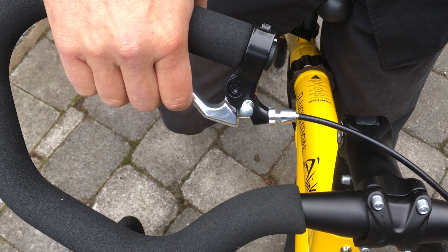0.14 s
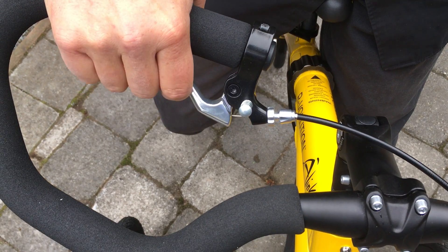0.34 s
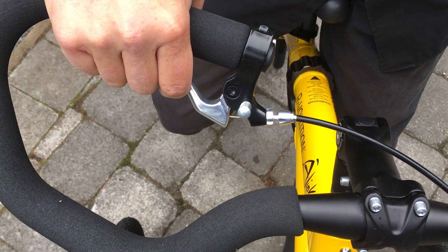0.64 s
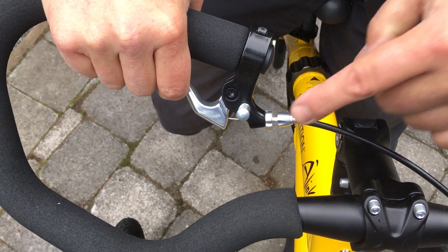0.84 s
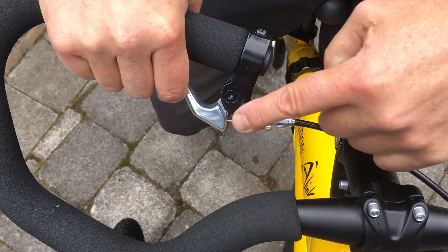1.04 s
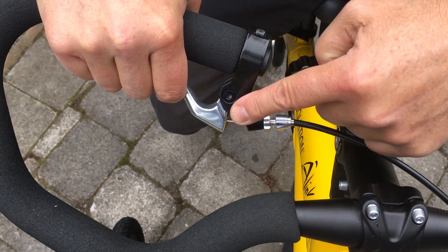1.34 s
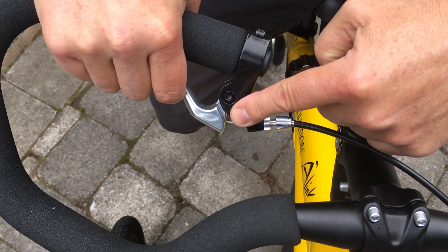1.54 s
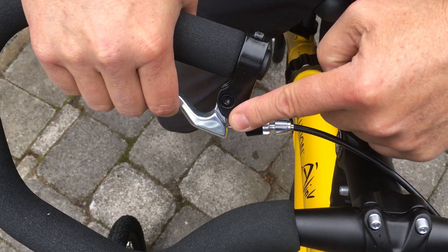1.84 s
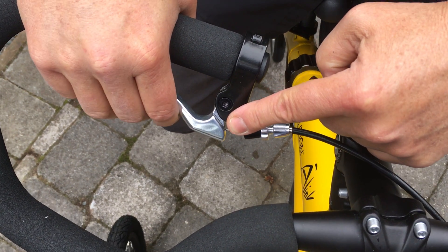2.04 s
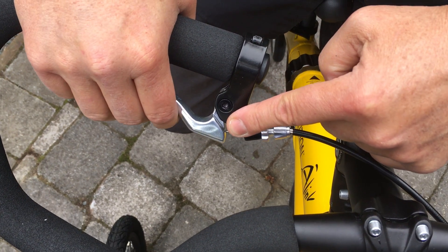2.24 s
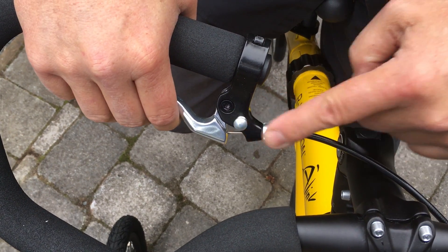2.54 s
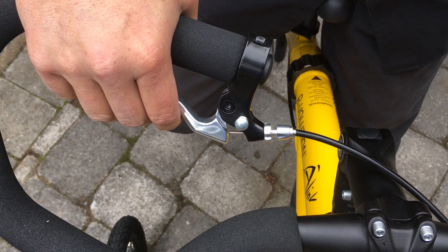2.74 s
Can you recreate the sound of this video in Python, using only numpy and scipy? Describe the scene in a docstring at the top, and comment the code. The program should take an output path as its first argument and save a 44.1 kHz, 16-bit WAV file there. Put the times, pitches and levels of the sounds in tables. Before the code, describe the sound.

A bicycle brake lever lock clicks, heard close outdoors over faint steady traffic rumble and a distant low engine. Light knocks and a cable ping come around 0.03-0.15 s, a sleeve slips and swishes at 0.4-0.65 s, and a fingertip rubs softly at 1.2 s. Ticks and a quick scrape from 1.35 s lead to one bright, sharp snap at 1.4 s, briefly rattling and ringing. Thin hiss lingers until about 1.8 s; faint ticks continue to 2.55 s.

```python
"""A hand squeezes a bicycle brake lever outdoors and a finger presses its lock pin home.
Under it all lie a rumble, street wash, far tyres (coloured noise) and a distant engine (two sines).
First come small knocks and ticks (noise bursts) with cable pings (dying sines), then a sleeve's slips and swish.
A fingertip rubs and the pin scrapes (shaped noise), amid more ticks, until the lock snaps in with one
sharp click, a burst with rattle and ringing. A thin hiss lingers, and a few last ticks follow."""
import sys
import numpy as np
from scipy import signal
from scipy.fft import rfft, irfft
from scipy.io import wavfile

SR = 44100
rng = np.random.default_rng(int(sys.argv[2]) if len(sys.argv) > 2 else 0)


def dump_mix(stems):
    """Bounce the given channels to the path in sys.argv[1] as a 16-bit WAV at rate SR."""
    frames = np.atleast_2d(stems).T  # one column per channel
    limited = np.clip(frames, -1, 1)  # hard clip at full scale
    pcm = np.round(limited * 32767).astype(np.int16)
    wavfile.write(sys.argv[1], SR, pcm)


N = 127890
T = np.arange(N) / SR


def amp(db):
    """Decibels to gain."""
    return 10 ** (np.asarray(db) / 20)


def unit(x):
    """Scales to rms 1."""
    return x / np.sqrt(np.mean(x ** 2) + 1e-20)


def add(mix, start_s, sound):
    """Mixes a sound in at a time, cutting whatever runs past the end."""
    part = mix[max(round(start_s * SR), 0):][:len(sound)]
    part += sound[:len(part)]


def read(colour, hz):
    """Reads a colour in dB at any frequency, on a log-frequency axis."""
    point_hz, point_db = np.transpose(colour)
    return np.interp(np.log(hz + 1), np.log(point_hz), point_db)


def level(points):
    """Gain over time, drawn through (time_s, level_db) points."""
    return amp(np.interp(T, *np.transpose(points)))


def stroke(points):
    """Gain over time of a passing gesture: silent before its first point and after its last."""
    return level(points) * (T > points[0][0]) * (T < points[-1][0])


def tint(x, colour):
    """Filters a sound by a colour."""
    hz = np.fft.rfftfreq(len(x), 1 / SR)
    return irfft(rfft(x) * amp(read(colour, hz)), len(x))


def noise(colour):
    """Steady coloured noise of rms 1."""
    return unit(tint(rng.standard_normal(N), colour))


def wander(rate_hz):
    """Smooth random drift of rms 1, fading out above a rate."""
    hz = np.fft.rfftfreq(N, 1 / SR)
    spectrum = rfft(rng.standard_normal(N)) * np.exp(-(hz / rate_hz) ** 2)
    return unit(irfft(spectrum, N))


def lowpass(x, edge_hz):
    """Steep band limit."""
    taps = signal.firwin(255, edge_hz, window=("kaiser", 8), fs=SR)
    return signal.oaconvolve(x, taps, "same")


def burst(colour_db, rise_s, decay_s, size=4096):
    """A contact: a brief flurry of micro-impacts with a causal colour; level is rms over 100 samples."""
    t = np.arange(size) / SR
    envelope = np.minimum(t / rise_s, 1) * np.exp(-np.maximum(t - rise_s, 0) / decay_s)
    flurry = rng.standard_normal(size) * envelope
    # flatten the flurry's spectrum while keeping it short
    for _ in range(3):
        spectrum = rfft(flurry)
        flurry = irfft(spectrum / (abs(spectrum) + 1e-12)) * envelope ** .2
    # minimum phase: the colour rings only after each impact
    log_gain = np.log(amp(colour_db(abs(np.fft.fftfreq(size, 1 / SR)))))
    causal_filter = np.exp(np.conj(signal.hilbert(log_gain)))
    out = np.fft.ifft(np.fft.fft(flurry) * causal_filter).real
    return 10 * out / np.linalg.norm(out)


def ring(modes):
    """Dying sines at random phases, each falling 60 dB in its t60."""
    t = T[:SR // 2]
    out = np.zeros(len(t))
    for pitch_hz, level_db, t60_s in modes:
        decay = np.exp(-np.log(1000) * t / t60_s)
        out += amp(level_db) * decay * np.sin(2 * np.pi * (pitch_hz * t + rng.random()))
    return out


# low traffic rumble: [time_s, level_db]; its colour: [pitch_hz, relative_db]
RUMBLE_LEVEL = [(0, -52), (1.2, -55.5), (1.6, -53), (2.9, -53.5)]
RUMBLE_COLOUR = [(22, -45), (32, -19.5), (50, -1), (65, 4), (85, -2.5), (102, 5), (135, -3), (175, -6),
                 (220, -21), (400, -44.5)]


def rumble():
    """Traffic rumble: low coloured noise under a slow level curve."""
    return level(RUMBLE_LEVEL) * noise(RUMBLE_COLOUR)


# faint street wash: [time_s, level_db]; its colour: [pitch_hz, relative_db]
STREET_LEVEL = [(0, -56.5), (.25, -60.5), (.8, -60), (1.2, -62), (1.7, -61.5), (2.05, -64.5), (2.4, -63),
                (2.9, -61)]
STREET_COLOUR = [(100, 10.5), (250, 0.5), (430, -2), (700, -1), (1000, 2.5), (1500, -4.5), (2200, -12.5),
                 (3200, -16.5), (5000, -31), (9000, -29), (16000, -54)]


def street():
    """Street wash: coloured noise whose level flutters by a fraction of a decibel."""
    flutter = amp(0.63 * wander(46))
    return level(STREET_LEVEL) * noise(STREET_COLOUR) * flutter


# tyre hiss of traffic moving away: [time_s, level_db]; its colour: [pitch_hz, relative_db]
TYRE_LEVEL = [(0, -68.5), (.3, -71.5), (1, -75), (2, -75.5), (2.9, -74)]
TYRE_COLOUR = [(600, -13.5), (1400, 1), (2000, -2.5), (3200, -11), (5000, -20), (10000, -32.5)]


def tyres():
    """Far tyres: coloured noise that sinks as the traffic moves away."""
    return level(TYRE_LEVEL) * noise(TYRE_COLOUR)


# fine steady hiss: [pitch_hz, relative_db]
AIR_COLOUR = [(1000, 21.5), (4000, 0.5), (6200, 11.5), (7500, -32), (9000, 9.5), (10500, -21.5), (13000, 8),
              (16000, 6.5)]
AIR_DB = -77


def air():
    """Fine hiss: coloured noise at a constant level."""
    return amp(AIR_DB) * noise(AIR_COLOUR)


# distant engine, orders sounding at 2 and 3 times base_hz:
# [time_s, base_hz, second_order_db, third_order_db]
ENGINE_ORDERS = [(0, 38.54, -60, -56), (.75, 38.63, -59, -53.5), (1.2, 37.57, -55, -58.5),
                 (1.6, 37.4, -57.5, -59), (2.1, 37.76, -57, -59.5), (2.9, 36.8, -62.5, -62.5)]
ENGINE_WAVER = 0.013  # rms pitch drift, as a fraction of the pitch


def engine():
    """Two low orders locked to one turning rate, wavering and slowly sagging in pitch."""
    time_s, base_hz, second_db, third_db = np.transpose(ENGINE_ORDERS)
    rate_hz = np.interp(T, time_s, base_hz) * (1 + ENGINE_WAVER * wander(4.5))
    turns = np.cumsum(rate_hz) / SR
    out = np.zeros(N)
    for order, order_db in [(2, second_db), (3, third_db)]:
        tone = np.sin(2 * np.pi * (order * turns + rng.random()))
        out += np.sqrt(2) * amp(np.interp(T, time_s, order_db)) * tone
    return out


# knocks and ticks of lever, pin and cable:
# [start_s, level_db, centre_hz, width_octaves, treble_db, decay_s]
TICKS = [(0.0246, -52.5, 2830, 0.66, -13, .0006), (0.0548, -60, 2870, 0.14, -17, 0.00057),
         (0.142, -43.5, 1680, .2, -33, 0.0056), (0.1475, -47, 1470, 0.47, -21, 0.007),
         (0.294, -65.5, 12500, 0.48, -15, .002), (0.5748, -58.5, 3400, 0.38, -31, .0006),
         (1.3287, -52.5, 2504, 0.52, -19, .001), (1.3528, -39, 2700, 0.56, -28, .0005),
         (1.3528, -50.5, 14300, .25, -23, .0007), (1.3568, -53, 1800, 0.32, -37, 0.0027),
         (1.3630, -58, 2593, .9, -32, .001), (1.3752, -57, 3000, 0.82, -30, .001),
         (1.3838, -54, 2800, 0.94, -25, .001), (1.8030, -58.5, 630, 0.14, -38, .003),
         (1.8028, -58, 3270, .7, -17, .0012), (1.8594, -54.5, 2650, 0.26, -23, 0.002),
         (1.9330, -67, 12500, .35, -22, .002), (2.0451, -58.5, 2812, 0.16, -7, .0015),
         (2.5441, -55, 10010, .6, -14, 0.003), (2.5442, -63.5, 3300, 0.37, -25, 0.0016)]
# cable pings as the strain on it changes: [start_s, pitch_hz, level_db, t60_s]
PINGS = [(.025, 2800, -53, 0.019), (.0545, 2940, -59, .025), (.0545, 7470, -60, 0.017),
         (.1465, 3250, -44, 0.032), (0.16, 3230, -60.5, 0.14), (.146, 14200, -59, .03),
         (1.8595, 2230, -57.5, .04)]
# what lever and handlebar ring with, levels as at the main snap: [pitch_hz, level_db, t60_s]
LEVER_MODES = [(635, -45, 0.061), (1210, -60.5, 0.06), (1518, -37.5, 0.036), (2030, -56, 0.059),
               (3880, -47, 0.053), (5310, -54, 0.031), (5870, -47, 0.056), (6440, -51, 0.039),
               (9324, -47, 0.059), (11160, -56.5, .035), (11700, -61, 0.045), (13900, -55, 0.03)]
TICK_RISE_S, TICK_RING_DB, TICK_RING_HZ = 0.00033, 7, 2500


def ticks():
    """Light contacts, each a broad resonance with a bright edge, and the ping of the cable."""
    out = np.zeros(N)
    # a light contact excites the modes less the higher they lie
    soft_modes = []
    for pitch_hz, level_db, t60_s in LEVER_MODES:
        softening_db = 10 * np.log10(1 + (pitch_hz / TICK_RING_HZ) ** 2)
        soft_modes.append((pitch_hz, level_db - softening_db, t60_s))
    for start_s, level_db, centre_hz, width_octaves, treble_db, decay_s in TICKS:
        def colour(hz):
            octaves = np.log2((hz + 1) / centre_hz)
            resonance = np.exp(-.5 * (octaves / width_octaves) ** 2)
            edge = amp(treble_db) * hz / (hz + centre_hz)
            return 20 * np.log10(resonance + edge + 1e-4)
        add(out, start_s, amp(level_db) * burst(colour, TICK_RISE_S, decay_s))
        ring_db = level_db - SNAPS[0][1] + TICK_RING_DB
        add(out, start_s, amp(ring_db) * ring(soft_modes))
    for start_s, *mode in PINGS:
        add(out, start_s, ring([mode]))
    return out


# sleeve brushing past as the arm reaches in: [time_s, level_db]; its colour: [pitch_hz, relative_db]
SLEEVE_LEVEL = [(.25, -88), (.42, -76), (.52, -69.5), (.57, -59.5), (.61, -57), (.635, -60), (.657, -79),
                (.8, -73.5), (.99, -66.5), (1.17, -75.5), (1.3, -100)]
SLEEVE_COLOUR = [(500, -16), (2000, 0.5), (3500, -1.5), (5500, -2), (8500, -2), (10500, -2), (13500, -1),
                 (16000, 1.5)]
# extra treble as the sleeve speeds up: [time_s, level_db]; its colour: [pitch_hz, relative_db]
SWISH_LEVEL = [(.53, -74), (.6, -62), (.632, -53), (.645, -60), (.654, -78)]
SWISH_COLOUR = [(3000, -25), (6000, -8), (8500, -1), (10500, -3), (13500, 2), (16000, 0.5)]
# colour of fabric catching in quick little slips: [pitch_hz, relative_db]
SLIP_COLOUR = [(2000, -26), (6000, -10), (8500, 2), (12000, -1), (16000, -1)]
SLIP_SPAN_S, SLIPS_PER_S, SLIP_DB, SLIP_DECAY_S = (0.38, .53), 71, -67, 0.0014


def sleeve():
    """Cloth brushes past, catching in small slips before it slides freely in a swish."""
    brush = stroke(SLEEVE_LEVEL) * noise(SLEEVE_COLOUR)
    swish = stroke(SWISH_LEVEL) * noise(SWISH_COLOUR)
    out = (brush + swish) * amp(.6 * wander(150))
    for start_s in np.arange(*SLIP_SPAN_S, 1 / SLIPS_PER_S):
        late, strength_db = rng.standard_normal(2)
        slip = burst(lambda hz: read(SLIP_COLOUR, hz), TICK_RISE_S, SLIP_DECAY_S)
        add(out, start_s + 0.0016 * late, amp(SLIP_DB + strength_db) * slip)
    return out


# soft rub of the fingertip landing: [time_s, level_db]; its colour: [pitch_hz, relative_db]
RUB_LEVEL = [(1.205, -77), (1.23, -59.5), (1.255, -63), (1.285, -74)]
RUB_COLOUR = [(400, -1), (800, -0.5), (1400, 5), (2200, -27), (6000, -26)]


def rub():
    """The fingertip lands: a short swell of dull noise."""
    return stroke(RUB_LEVEL) * noise(RUB_COLOUR)


# pin scraping towards its catch: [time_s, level_db]; its colour: [pitch_hz, relative_db]
SCRAPE_LEVEL = [(1.353, -60), (1.356, -48), (1.362, -46.5), (1.371, -58), (1.379, -53), (1.385, -47.5),
                (1.397, -49), (1.402, -68)]
SCRAPE_COLOUR = [(300, -13), (1150, -17), (1380, -6.5), (1520, 5.5), (1620, -4.5), (1730, -1), (1880, -8.5),
                 (2050, -1), (2250, -10.5), (2700, -14.5), (4000, -14.5), (5400, -25), (6300, -18.5),
                 (7600, -34.5), (15000, -25.5)]
SCRAPE_GRAIN_DB = 2  # most the grain can lift or dip the noise before colouring


def scrape():
    """The pin grates along the lever: noise roughened by a fast drift, then coloured."""
    grain = amp(SCRAPE_GRAIN_DB * np.tanh(wander(408)))
    grains = rng.standard_normal(N) * grain
    return stroke(SCRAPE_LEVEL) * unit(tint(grains, SCRAPE_COLOUR))


# the lock snapping in and its rebound: [start_s, level_db]
SNAPS = [(1.3981, -21.5), (1.4037, -44)]
# colour of the snap: [pitch_hz, relative_db]
SNAP_COLOUR = [(200, -32.5), (450, -37), (620, -30), (850, -23), (1100, -11), (1550, -8.5), (2300, -7.5),
               (2800, 4.5), (4100, 3.5), (5200, 4), (6600, -6.5), (7400, -2), (8100, 4.5), (8900, 4.5),
               (9700, -17), (10900, 5), (11900, -0.5), (14200, 6.5), (15600, -14), (16800, -28)]
# colour of the dense, fast-dying rattle of the small parts: [pitch_hz, relative_db]
RATTLE_COLOUR = [(300, -13.5), (1400, 8), (2600, -5), (5200, 6), (7000, -2), (8500, -2), (9800, -3),
                 (11500, 3.5), (14000, 4), (15700, -11), (16500, -28)]
SNAP_RISE_S, SNAP_DECAY_S, RATTLE_DECAY_S, RATTLE_DB = 0.00047, .0006, 0.0049, -31


def lock():
    """The pin snaps into its catch, rebounds once and sets the lever rattling and ringing."""
    main_start_s, main_db = SNAPS[0]
    age = np.maximum(T - main_start_s, 0)
    rattle_envelope = np.minimum(age / SNAP_RISE_S, 1) * np.exp(-age / RATTLE_DECAY_S)
    out = amp(RATTLE_DB) * noise(RATTLE_COLOUR) * rattle_envelope
    for start_s, level_db in SNAPS:
        snap = burst(lambda hz: read(SNAP_COLOUR, hz), SNAP_RISE_S, SNAP_DECAY_S)
        add(out, start_s, amp(level_db) * snap)
        add(out, start_s, amp(level_db - main_db) * ring(LEVER_MODES))
    return out


# thin hiss that lingers after the click: [time_s, level_db]; its colour: [pitch_hz, relative_db]
HISS_LEVEL = [(1.395, -100), (1.41, -67), (1.5, -66), (1.8, -65.5), (1.82, -74), (1.95, -80)]
HISS_COLOUR = [(500, -0.21), (3000, 0.063), (6000, 0.058), (10000, -1), (13500, 0), (16000, 0.55)]


def hiss():
    """A thin hiss: bright noise that comes up with the click and lingers after it."""
    return stroke(HISS_LEVEL) * noise(HISS_COLOUR)


# colour of the reflections off paving and walls: [pitch_hz, relative_db]
ECHO_COLOUR = [(300, 21), (1500, 6), (2800, -3), (5200, 3), (8000, -5), (12000, 1), (16000, -16)]
ECHO_DB, ECHO_T60_S, ECHO_DELAY_S = -21.5, 0.3, 0.0086


def echoes(x):
    """A faint, short outdoor tail: convolution with dying coloured noise after a small delay."""
    t = T[:SR // 2]
    decay = np.exp(-np.log(1000) * t / ECHO_T60_S)
    tail = tint(rng.standard_normal(len(t)), ECHO_COLOUR) * decay * (t > ECHO_DELAY_S)
    return amp(ECHO_DB) * signal.fftconvolve(x, tail / np.linalg.norm(tail))[:N]


SOFT_EDGE_HZ, EDGE_HZ = 15750, 16500  # top of all but the direct snap, top of the whole mix


def scene():
    """The lever close by, the street behind; the direct snap alone skips the softer band limit."""
    background = rumble() + street() + tyres() + air() + engine()
    handling = ticks() + rub() + scrape()
    snap = lock()
    soft = background + handling + sleeve() + hiss() + echoes(snap + handling)
    return (snap + lowpass(soft, SOFT_EDGE_HZ))[None]


def record(dry):
    """Limits the top of the band."""
    return lowpass(dry[0], EDGE_HZ)[None]


dry = scene()
out = record(dry)
dump_mix(out)
```